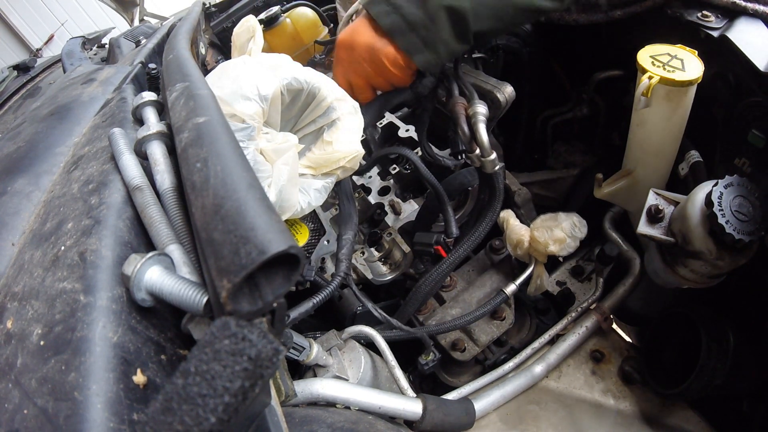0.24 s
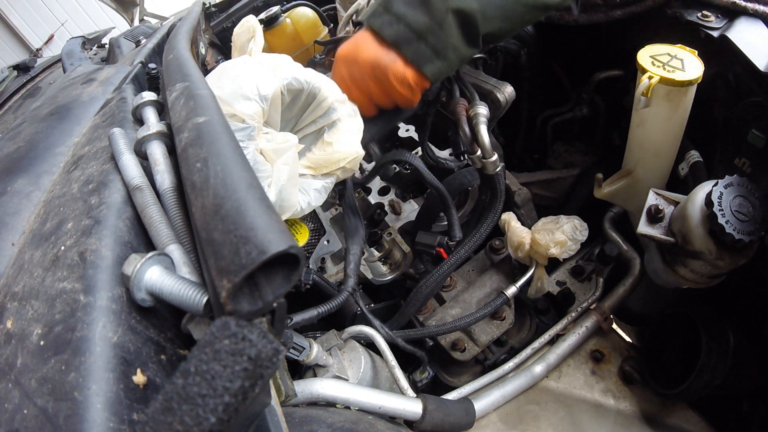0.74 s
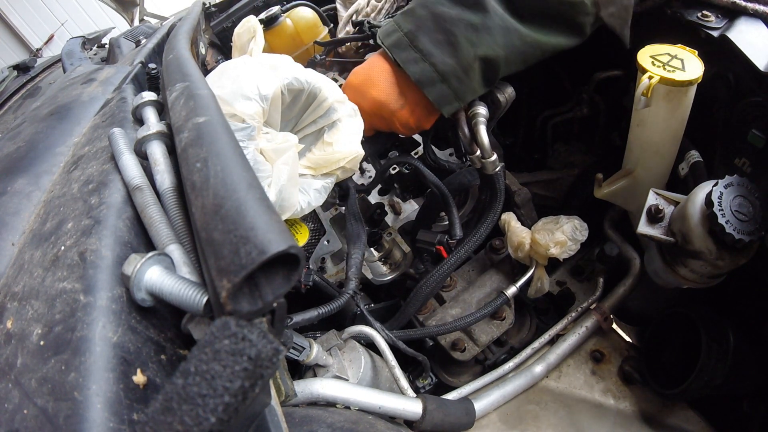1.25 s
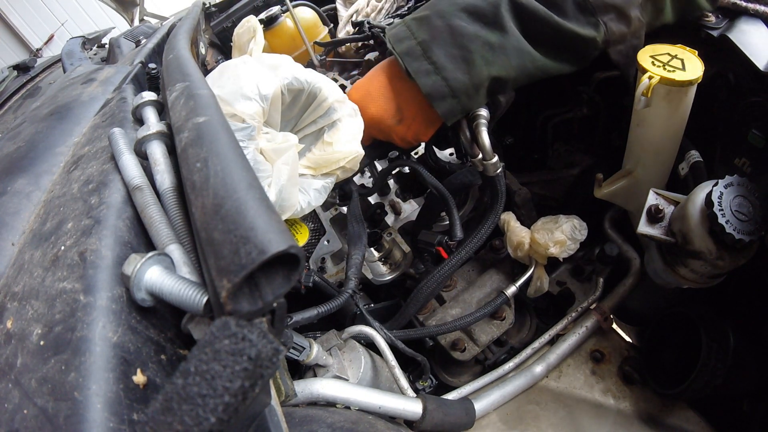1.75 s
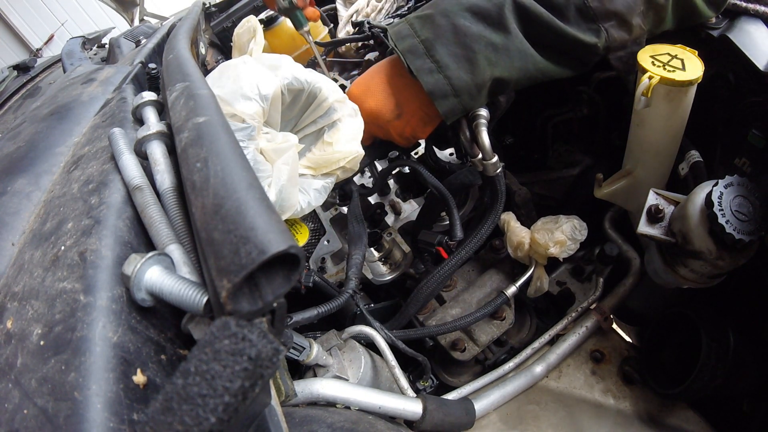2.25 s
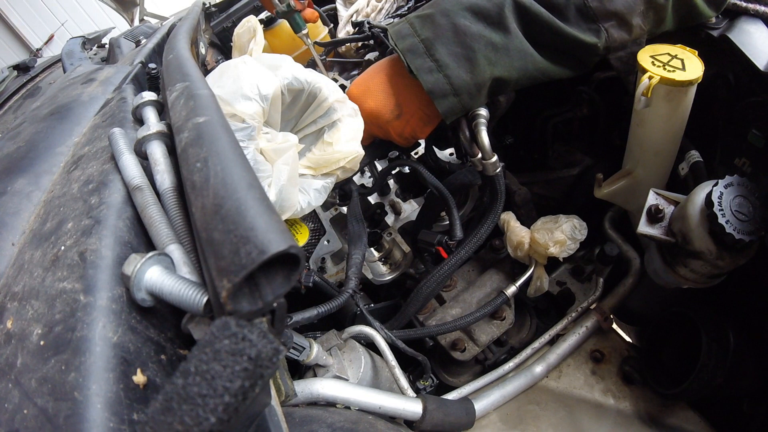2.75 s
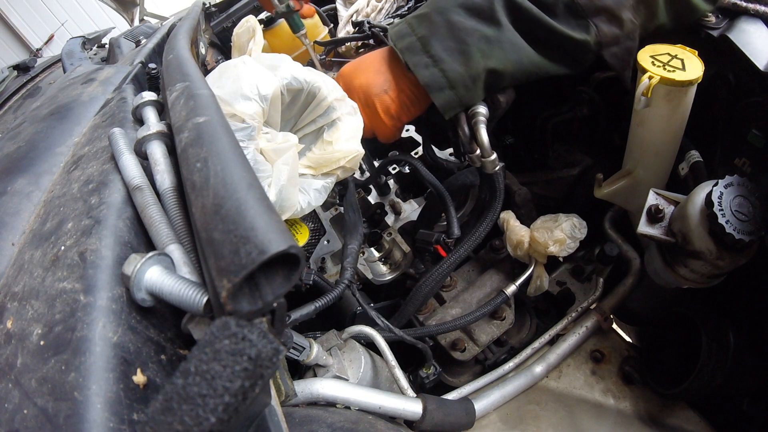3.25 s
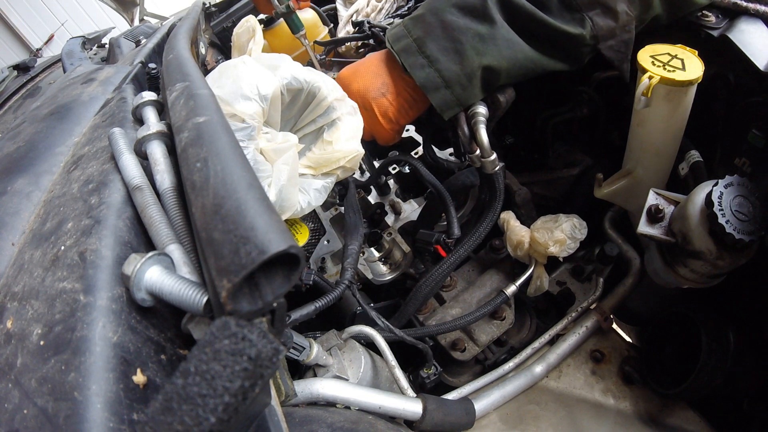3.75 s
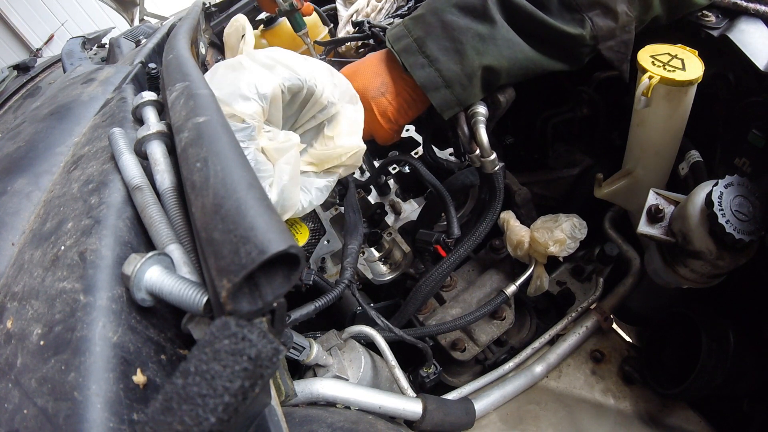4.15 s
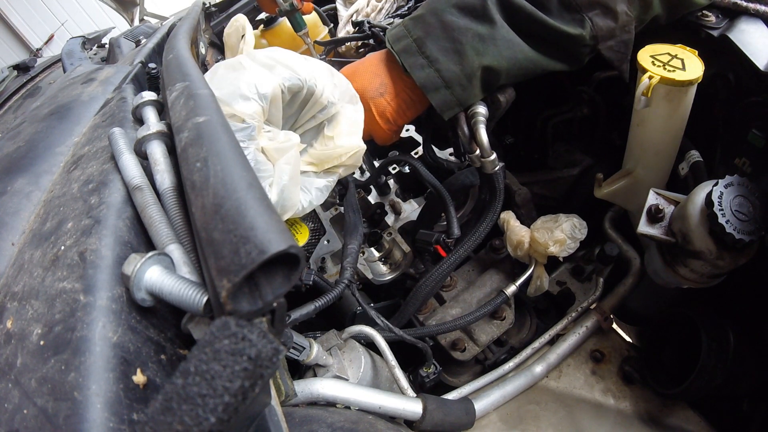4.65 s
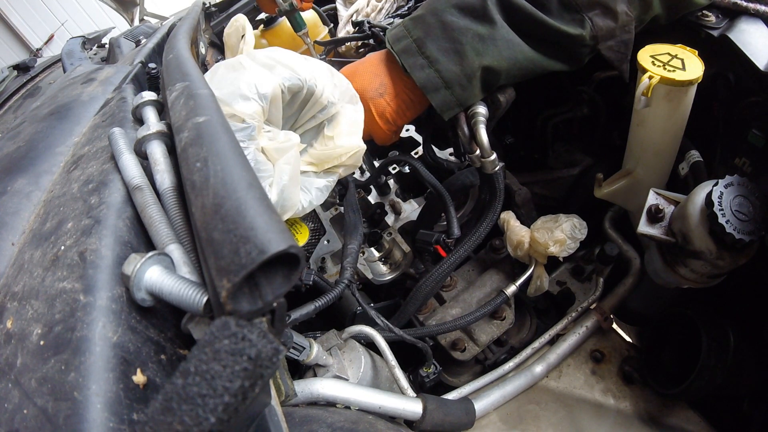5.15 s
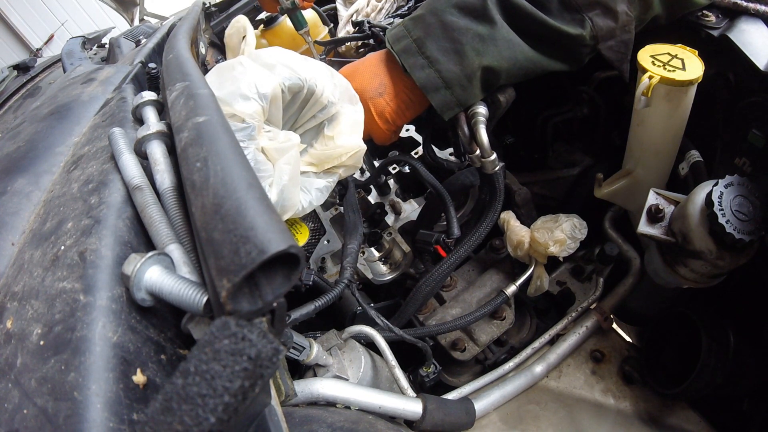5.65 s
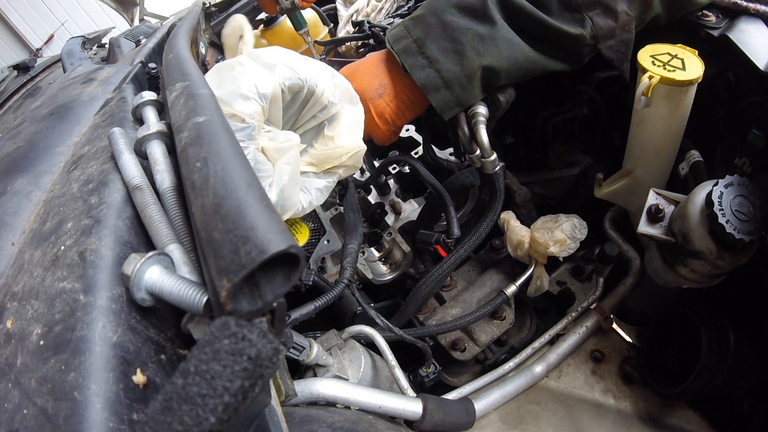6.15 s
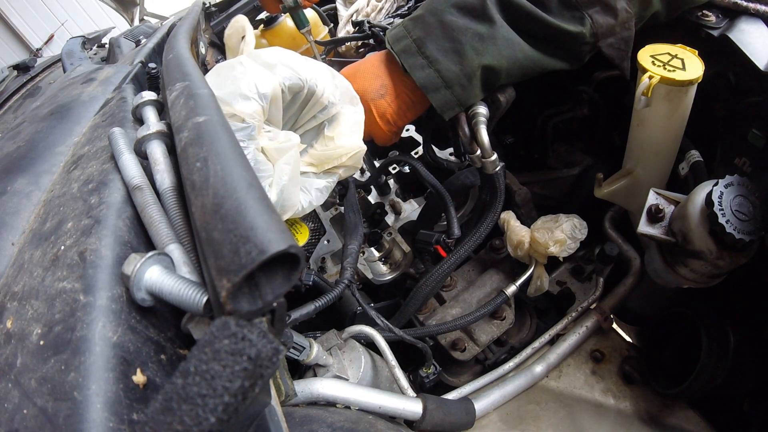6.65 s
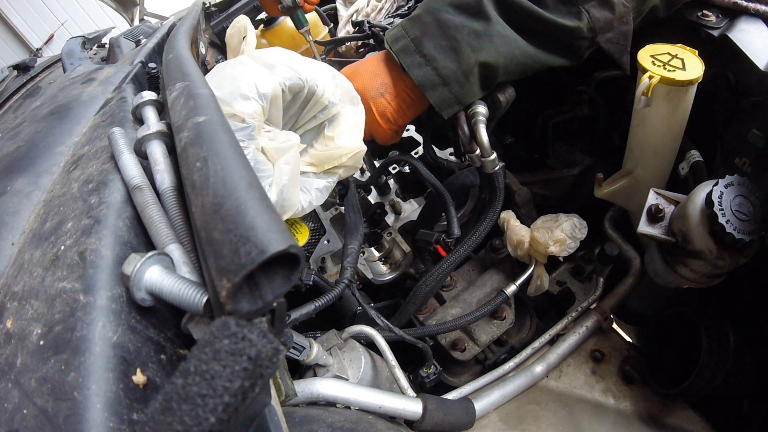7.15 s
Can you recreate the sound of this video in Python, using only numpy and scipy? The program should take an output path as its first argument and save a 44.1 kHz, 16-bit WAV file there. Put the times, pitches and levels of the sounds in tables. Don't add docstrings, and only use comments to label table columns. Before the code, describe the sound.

Compressed air seeps steadily, pops once from a valve, then bursts open into a loud hissing jet that dies in a soft puff.

```python
import sys
import numpy as np
from scipy import signal
from scipy.fft import rfft, irfft, next_fast_len
from scipy.io import wavfile
from scipy.ndimage import uniform_filter1d, map_coordinates

SR = 44100
rng = np.random.default_rng(int(sys.argv[2]) if len(sys.argv) > 2 else 0)


def boost(x):
    u = np.asarray(x, float) / 20
    return 10 ** u


def transcribe(u):
    v = np.clip(np.atleast_2d(u).T, -1, 1)
    q = np.round(v * 32767).astype(np.int16)
    wavfile.write(sys.argv[1], SR, q)


N = 325700


def unit(x):
    return x / np.sqrt(np.mean(x ** 2) + 1e-20)


def curves(rows):
    s, *cols = np.transpose(rows)
    return [np.interp(np.arange(N) / SR, s, c) for c in cols]


def wobble(rate):
    return map_coordinates(rng.standard_normal(int(N * rate / SR) + 4), [np.arange(N) * rate / SR])


def swell(start_s, peak_db, rise_s, t60_s):
    since = np.clip(np.arange(N) / SR - start_s, 0, None)
    rise = np.sin(np.pi / 2 * np.clip(since / rise_s, 0, 1)) ** 2
    return rise * boost(peak_db - 60 * np.clip(since - rise_s, 0, None) / t60_s)


def rush(spectrum, hollows, patchy_db):
    z = signal.stft(rng.standard_normal(N), nperseg=512)[2]
    patches = uniform_filter1d(uniform_filter1d(rng.standard_normal(z.shape), 5, 0), 12, 1)
    noise = signal.istft(z * boost(patchy_db * unit(patches)), nperseg=512)[1][:N]
    size = next_fast_len(N + 8192)
    hz = np.fft.rfftfreq(size, 1 / SR)
    f, db = np.transpose(spectrum)
    colour_db = np.interp(np.log(hz + 1), np.log(f + 1), db)
    for centre, width, boost_db in hollows:
        colour_db = colour_db + boost_db / (1 + (2 * (hz - centre) / width) ** 2)
    return unit(irfft(rfft(noise, size) * boost(colour_db), size)[:N])


def shop():
    # pitch_hz, level_db
    shop_colour = [(8.8, -35), (15, -7.5), (43, -1.5), (60, -2), (92, -14), (178, -21.5), (226, -21.5),
                   (436, -29.5), (579, -31), (1170, -27), (1450, -32.5), (2350, -32), (2800, -35.5),
                   (3640, -69), (6160, -120)]
    hums = [(58.5, 14.3, 2.7), (822, 240, 3.9), (1318, 96, 2.5)]  # pitch_hz, width_hz, boost_db
    return boost(-48.0 + 0.39 * wobble(2.83)) * rush(shop_colour, hums, patchy_db=0.3)


def knocks():
    # start_s, level_db, pitch_hz, t60_s (time to
    # fall 60 dB)
    knock_list = [(3.832, -36, 500, 0.0068), (3.833, -41, 1500, .006), (.301, -47, 1600, .04),
                  (.301, -42, 750, 0.033), (.302, -45, 1200, 0.035), (.545, -43, 800, 0.015),
                  (3.18, -45.5, 250, 0.088), (3.491, -50.5, 124, 0.62), (3.49, -54, 282, 0.24)]
    out, t = np.zeros(N + SR), np.arange(SR // 2) / SR
    for start_s, db, hz, t60_s in knock_list:
        scrape = 0.28 * rng.standard_normal(len(t)) * boost(-60 * t / .02)
        ring = np.sin(2 * np.pi * hz * t) + scrape
        shape = boost(db - 60 * t / t60_s) * (1 - np.exp(-t / 0.0015))
        out[round(start_s * SR):][:len(t)] += shape * ring
    return out[:N]


def arm_ridges(hiss):
    # time_s, closed share (0-1)
    arm_path = [
        (0, 0),
        (.75, .06),
        (1.08, .4),
        (1.42, 1),
        (1.65, 1),
        (1.85, .8),
        (2.2, 1),
    ]
    upper_hz, lower_hz = (8100, 6600), (6600, 5950)
    still_db, sliding_db, width_hz = 5.5, 5, 200
    hz, t, z = signal.stft(hiss, SR, nperseg=512)
    hz = hz[:, None]
    closed = np.interp(t, *np.transpose(arm_path))
    ridge_db = still_db + sliding_db * np.sin(np.pi * closed)
    ridge_db = ridge_db * np.interp(t, [1.7, 2.7], [1, 0])

    def ridge(ends, share):
        centre = ends[0] + (ends[1] - ends[0]) * share
        return ridge_db / (1 + (2 * (hz - centre) / width_hz) ** 2)

    shadow_db = -3.5 * closed * (t < 2.72) / (1 + (2 * (hz - 4250) / 700) ** 4)
    colour_db = ridge(upper_hz, closed) + ridge(lower_hz, closed ** 2) + shadow_db
    return signal.istft(z * boost(colour_db), SR, nperseg=512)[1][:N]


def leak():
    # time_s, level_db, depth in the bay (0-1)
    nozzle_path = [(0, -48, .06), (1.3, -49.5, .2), (2.2, -46, .35), (2.6, -43, .33), (2.8, -42, .75),
                   (3.1, -41, .8), (3.85, -41.5, 1), (4.0, -39.5, 1), (4.7, -42.5, 1), (5.2, -41.5, 1),
                   (6.95, -39.5, 1), (7.22, -44, 1), (7.39, -37.5, 1)]
    # start_s, jump_db
    spit_list = [(.375, 0), (.495, 2), (.705, 1.5), (.985, 2), (1.315, 2.5), (1.44, 3.5), (1.515, 2.5),
                 (2.315, 0.5)]
    # pitch_hz, level_db
    open_colour = [(1410, -46), (2400, -17.5), (2810, -34), (2940, -20), (3370, -21), (4500, -22),
                   (5880, -30.5), (6140, -4.5), (6940, 4.5), (7570, -6), (8260, -10), (8810, -20),
                   (12200, -34), (13500, -44)]
    bay_colour = [(880, -25), (1500, -26.5), (2030, -23), (2270, -16), (2530, -29), (2800, -24.5),
                  (4240, -20), (4910, -12.5), (5690, -18), (6590, 1.5), (8290, -15), (11500, -29),
                  (12800, -34), (13500, -51)]
    down_colour = [(880, -50.5), (1500, -22), (2020, -20.5), (2320, -19), (2870, -25.5), (3150, -22.5),
                   (3970, -17.5), (4270, -20.5), (4690, -12), (5690, -16), (6790, 4.5), (9390, -19),
                   (11600, -26), (13700, -45)]
    # pitch_hz, width_hz, boost_db
    hiss_bands = [(2333, 260, 5.5), (2860, 190, 12.5), (3000, 78, -6.5), (3280, 130, -1.5), (3480, 170, 5),
                  (3764, 100, -11), (4090, 180, 4), (4170, 90, -8), (4360, 110, -10.5), (5450, 200, 2.5),
                  (5530, 380, 1.5), (5900, 140, 2), (6070, 120, -4.5), (6105, 210, 5), (7500, 110, 1),
                  (7960, 150, -4), (8670, 200, -6), (9500, 180, 2.5), (10420, 170, -8), (10450, 200, 6.5),
                  (11400, 360, 4)]
    case_skirts = [(6000, 300, -3), (6410, 250, 3), (7480, 400, 2)]
    t = np.arange(N) / SR
    level_db, depth = curves(nozzle_path)
    depth = np.clip(depth, 0, 1)
    hiss = np.sqrt(1 - depth) * rush(open_colour, [], patchy_db=0.5)
    hiss = hiss + np.sqrt(depth) * rush(bay_colour, hiss_bands, patchy_db=1.05)
    for start_s, jump_db in spit_list:
        since = np.clip(t - start_s, 0, None)
        level_db = level_db + jump_db * np.clip(since / .008, 0, 1) * np.exp(-since / 0.087)
    down = rush(down_colour, hiss_bands + case_skirts, patchy_db=1.5)
    hiss = np.where(t < 3.9, arm_ridges(hiss), down)
    edge = rush([(8000, -37.5), (8500, -5), (8650, 1.0), (8850, -8), (9400, -40)], [], patchy_db=4.5)
    hiss = hiss + boost(np.interp(t, [6.9, 7.1, 7.39], [-22, -13, -12])) * edge
    return boost(level_db + .6 * wobble(11) + .6 * wobble(40)) * hiss


def pops():
    # start_s, jet_db, rise_s, t60_s, low_roar_db (against the jet)
    pop_list = [
        (3.886, -2.5, 0.0094, 0.05, -15.5),
        (3.917, -12, 0.015, 0.099, -14.5),
        (3.951, -29.5, 0.006, 0.26, -11),
        (5.292, -4.5, .010, 0.04, -12.5),
        (5.312, -25, .004, 0.18, -12),
        (5.336, -16, 0.014, 0.14, -15),
    ]
    # pitch_hz, level_db
    burst_colour = [(1180, -44), (2000, -16.5), (2990, -30.5), (3240, -16.5), (4300, -20), (4850, -14.5),
                    (5480, -25), (6440, -3), (6810, 1), (7750, -4.5), (10400, -31), (12000, -34.5),
                    (13700, -51)]
    low_colour = [(59, -21), (100, 0.5), (544, -17), (870, -11), (1110, -15.5), (1330, -11), (1490, -19.5),
                  (2260, -15), (2420, -30), (3000, -9.5), (3900, -33), (6600, -120)]
    low_hollows = [(870, 150, 3.0), (150, 66, -2.5), (690, 110, 3.5), (1500, 330, 2.5)]
    t = np.arange(N) / SR
    burst, low, push = np.zeros((3, N))
    for start_s, db, rise_s, t60_s, low_db in pop_list:
        since = np.clip(t - start_s, 0, None)
        burst = np.hypot(burst, swell(start_s, db, rise_s, t60_s))
        low = np.hypot(low, swell(start_s, db + low_db, rise_s, t60_s))
        swing = np.cos(2 * np.pi * 33 * since) * boost(-60 * since / 0.11) * (1 - np.exp(-since / 0.0022))
        push += boost(-7.5 + 1.3 * db) * swing
    sound = burst * rush(burst_colour, [], patchy_db=0.5)
    sound = sound + low * rush(low_colour, low_hollows, patchy_db=2.5)
    return sound, push


def blast():
    # time_s, jet_db
    trigger_path = [(5.4, -32.5), (5.51, -26), (5.76, -27.5), (5.82, -24.5), (6.2, -26), (6.33, -29.5),
                    (6.44, -25), (6.65, -23.5), (6.762, -27.5)]
    # time_s, dip_db
    flutter_list = [(5.92, -1.5), (6.118, -2.5), (6.276, -1.5)]
    # pitch_hz, level_db
    jet_colour = [(1410, -52.5), (2400, -25), (2790, -27.5), (3680, -20), (4340, -23.5), (4730, -18.5),
                  (5550, -25), (6510, -3.5), (6790, 0), (8440, -10), (10300, -28), (12200, -32.5),
                  (12800, -35), (13500, -87)]
    roar_colour = [(59, -31), (100, 1.5), (309, -3.5), (414, -9.5), (609, -7), (1150, -6), (1360, -4.5),
                   (2760, -6.5), (4000, -8), (5200, -29), (8800, -120)]
    # pitch_hz, width_hz, boost_db
    jet_bands = [(894, 92, 2.5), (1381, 36, 9.5), (1970, 130, -1.5), (2580, 54, 6), (2770, 140, -8.5),
                 (3650, 490, 2.5), (4470, 150, -3.5), (4566, 160, 7.5), (5070, 220, 7.5),
                 (5400, 220, 4.5), (6560, 63, 6), (6655, 170, 5.5), (7250, 150, -1.5), (7460, 79, 7.5),
                 (7900, 130, 1.5), (8000, 150, 0.5), (8230, 150, 2.5), (8500, 120, 0), (9980, 100, -3),
                 (10860, 260, -8)]
    t = np.arange(N) / SR
    shut_s, shut_t60_s = trigger_path[-1][0], .15
    jet_db = curves(trigger_path)[0] - 60 * np.clip(t - shut_s, 0, None) / shut_t60_s
    for time_s, dip_db in flutter_list:
        jet_db = jet_db + dip_db * np.exp(-((t - time_s) / 0.01) ** 2)
    opening = np.interp(t, (5.34, 5.37), [0, 1])
    last_puff = swell(start_s=6.79, peak_db=-26.5, rise_s=0.09, t60_s=0.19)
    jet = np.hypot(opening * boost(jet_db), last_puff)
    sound = jet * boost(8.5) * rush(jet_colour, jet_bands, patchy_db=0.24)
    return sound + jet ** .67 * boost(-29.5 + 8.5) * rush(roar_colour, jet_bands, patchy_db=1.5)


def gun():
    pop_sound, push = pops()
    eddies = boost(.5 * wobble(14) + 0.63 * wobble(150) + 0.56 * wobble(600))
    return eddies * (blast() + pop_sound) + push


def scene():
    return (shop() + knocks() + leak() + gun())[None]


def gain_control():
    # start_s, gain_db, hold_s, recovery_s
    duck_list = [
        (0, -5.5, 0, 0.98),
        (3.834, -8.5, 0.36, 0.86),
        (5.243, -7.5, 0.15, 2.55),
        (6.9, -4, 0, 0.42),
    ]
    full_db = .5
    t, gain_db = np.arange(N) / SR, np.zeros(N)
    for start_s, db, hold_s, recovery_s in duck_list:
        since = np.clip(t - start_s - hold_s, 0, None)
        back = full_db + (db - full_db) * np.exp(-since / recovery_s)
        gain_db = np.where(t >= start_s, back, gain_db)
    return boost(uniform_filter1d(gain_db, size=8))


def camera_rounding(x, size=1880):
    # pitch_hz, level_db (nearby sound over step size)
    coarse_steps = [(100, 12), (1800, 5), (2600, -2), (3900, -3), (4400, -2), (5000, 0), (6000, 5),
                    (9700, 3), (9950, -8), (12400, -8), (12650, -11), (13200, -12), (13900, -18)]
    n, k = np.arange(2 * size), np.arange(size * 2 // 3)
    window = np.sin(np.pi * (n + .5) / (2 * size))
    cosines = np.cos(np.pi / size * np.outer(k + .5, n + .5 + size / 2))
    basis = np.sqrt(2 / size) * window * cosines
    padded = np.pad(x, (size, 2 * size - N % size))
    frames = np.lib.stride_tricks.sliding_window_view(padded, 2 * size)[::size]
    lines = frames @ basis.T
    f, db = np.transpose(coarse_steps)
    near = np.sqrt(np.abs(uniform_filter1d(lines ** 2, size=60, axis=1)) + 1e-20)
    spare_db = 1.5 * rng.standard_normal((len(lines), 1))
    step = near * boost(-np.interp((k + .5) * SR / 2 / size, f, db) - spare_db)
    rounded = np.sign(lines) * step * np.floor(np.abs(lines) / step + .4)
    calm = np.abs(frames).max(1) < 11 * np.median(np.abs(frames), 1) + 1e-9
    pieces = np.where(calm[:, None], rounded, lines) @ basis
    return (pieces[1:, :size] + pieces[:-1, size:]).ravel()[:N]


def band_limit(x):
    return signal.sosfilt(signal.butter(12, 13880, fs=SR, output="sos"), x)


def record(dry):
    x = dry[0] * gain_control()
    x = x / (1 + np.abs(x / .85) ** 4) ** .25
    mix = camera_rounding(x)[None]
    return band_limit(mix)


dry = scene()
out = record(dry)
transcribe(out)
```